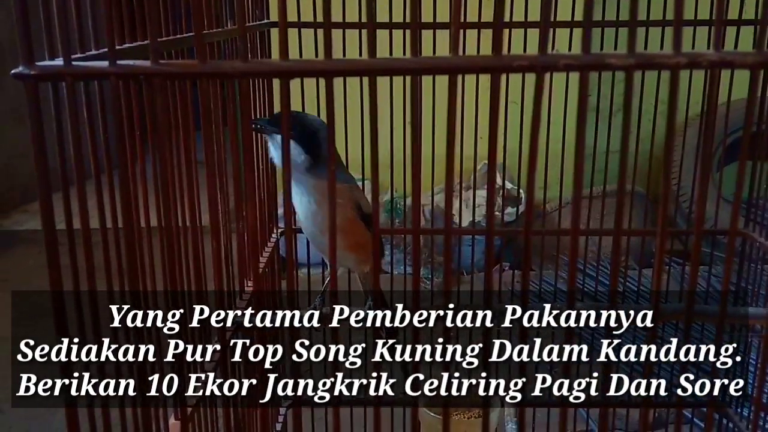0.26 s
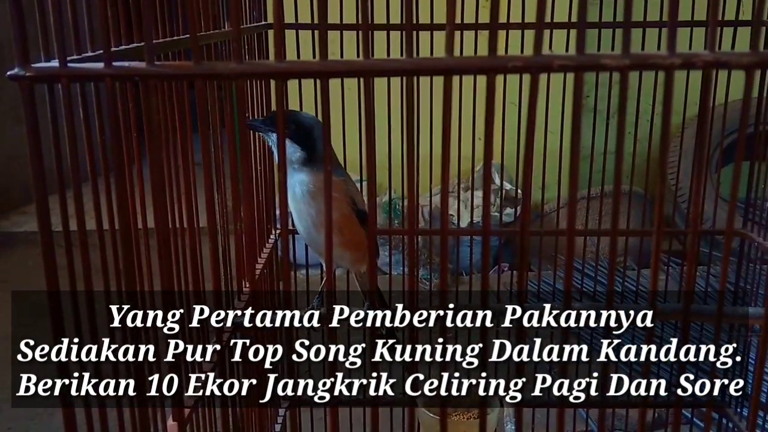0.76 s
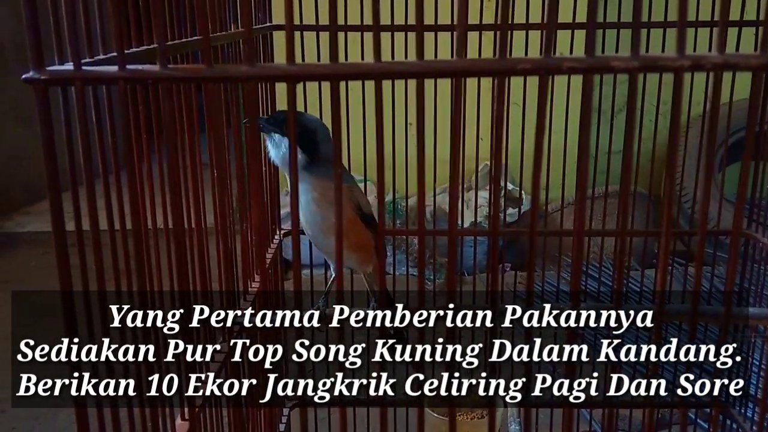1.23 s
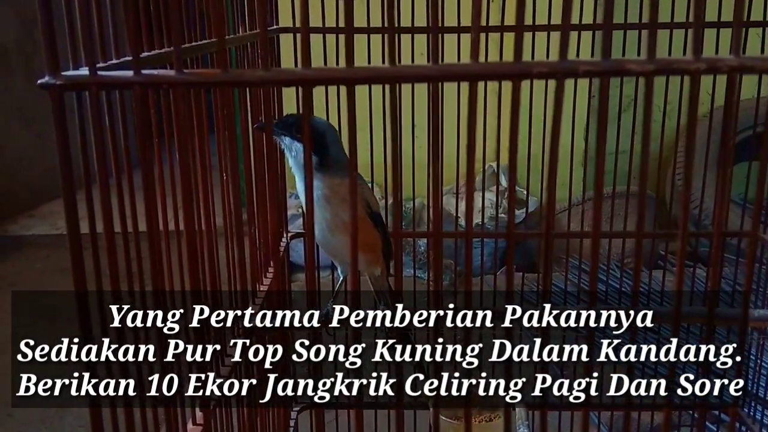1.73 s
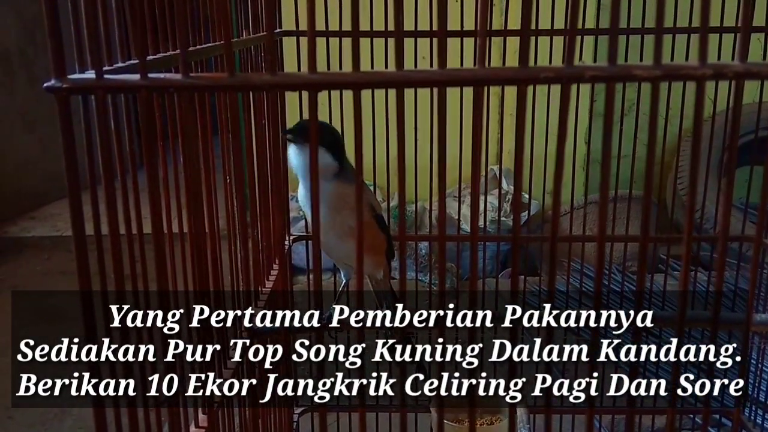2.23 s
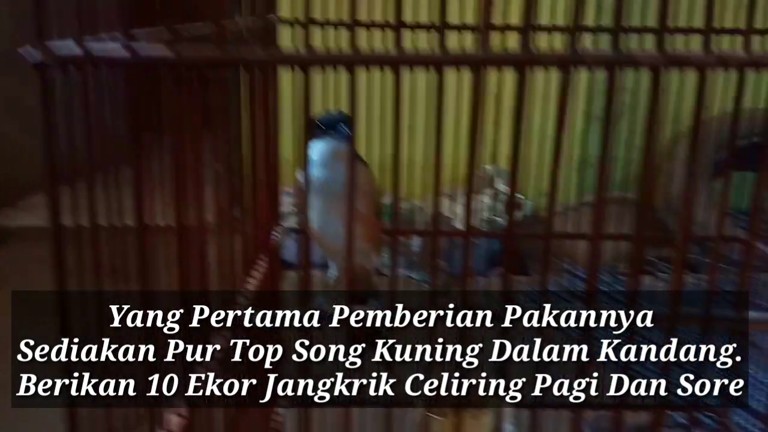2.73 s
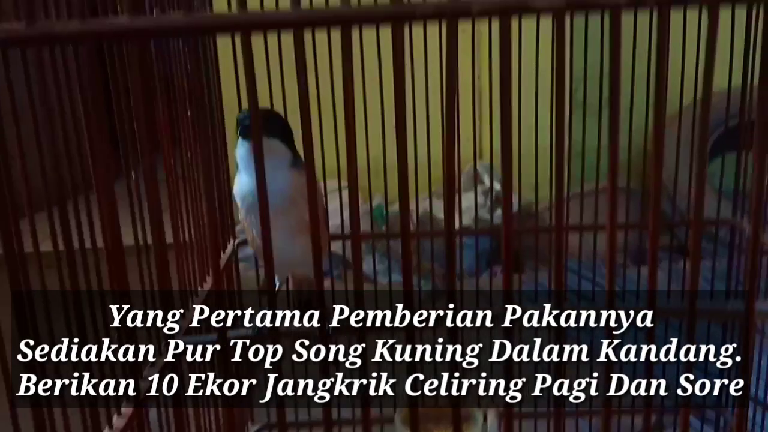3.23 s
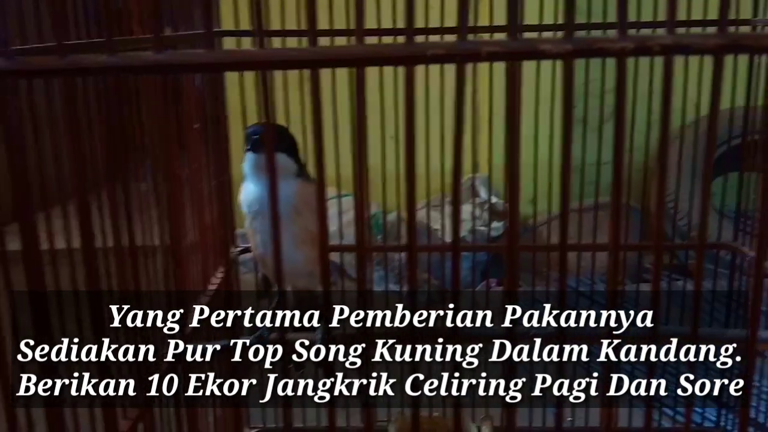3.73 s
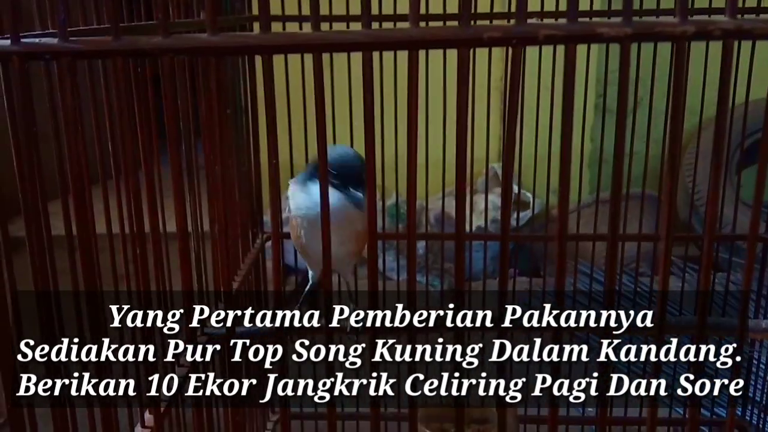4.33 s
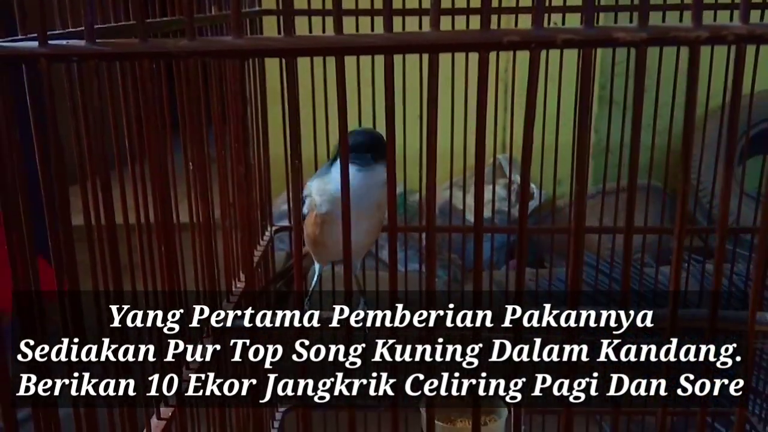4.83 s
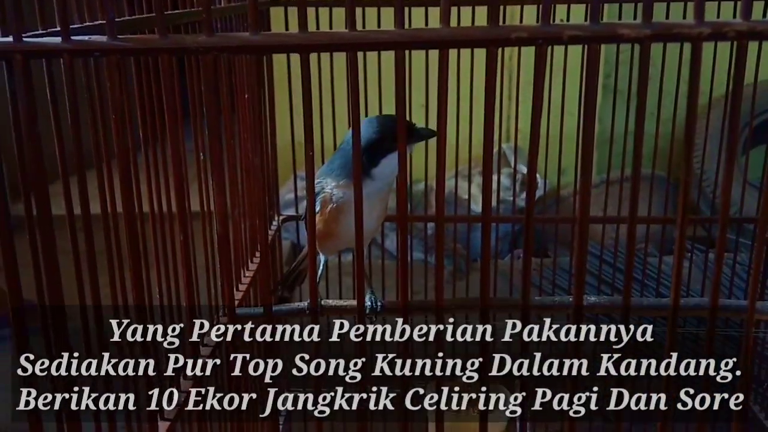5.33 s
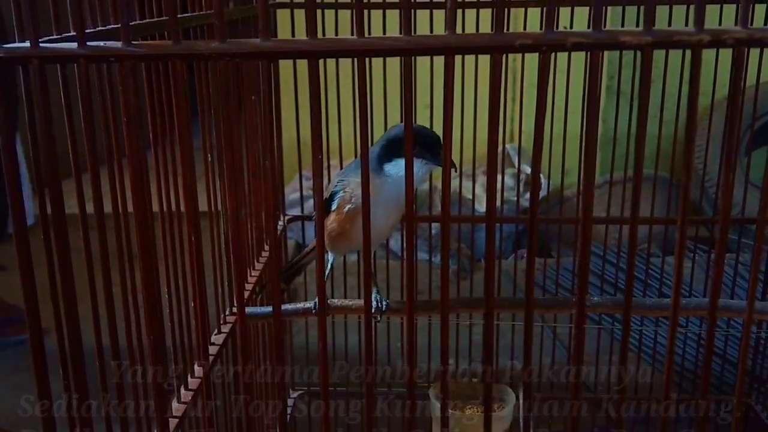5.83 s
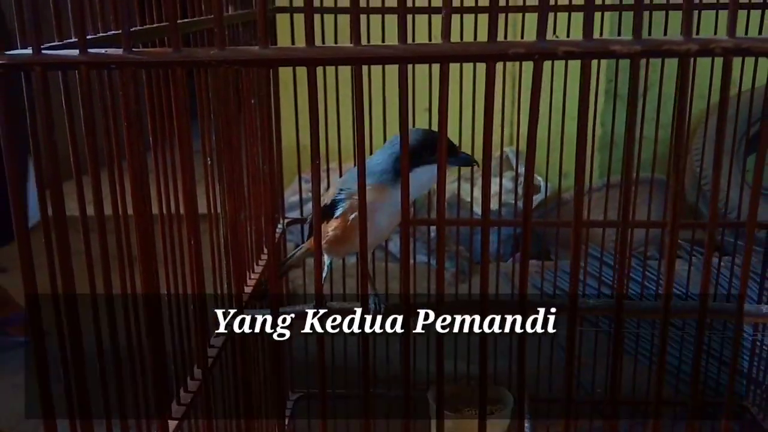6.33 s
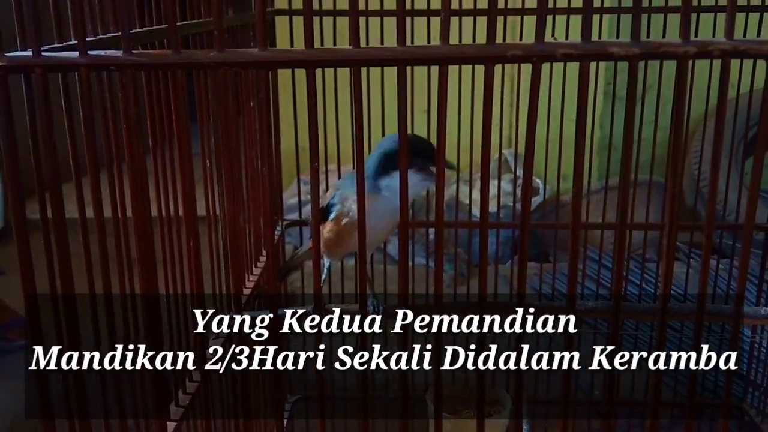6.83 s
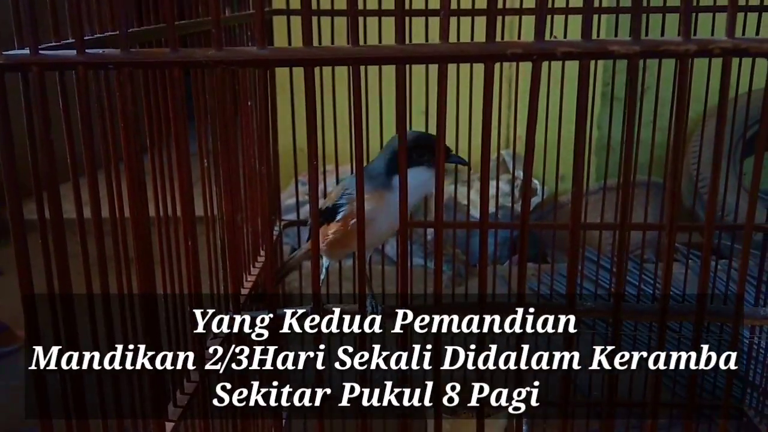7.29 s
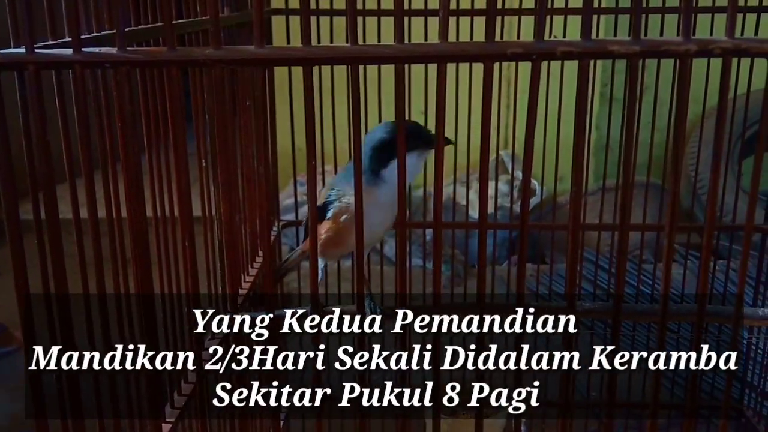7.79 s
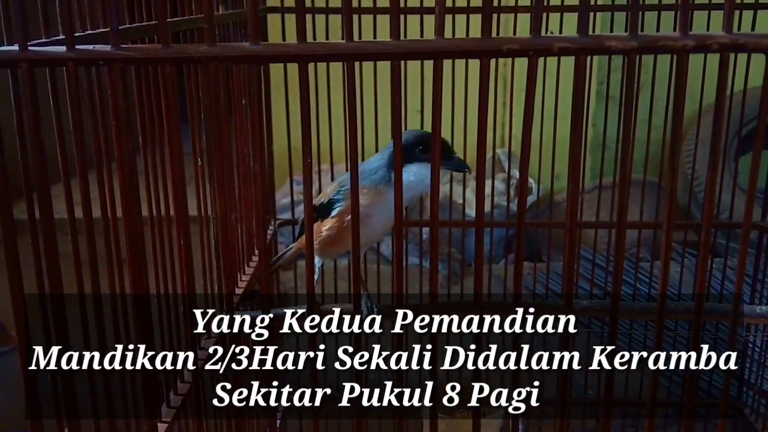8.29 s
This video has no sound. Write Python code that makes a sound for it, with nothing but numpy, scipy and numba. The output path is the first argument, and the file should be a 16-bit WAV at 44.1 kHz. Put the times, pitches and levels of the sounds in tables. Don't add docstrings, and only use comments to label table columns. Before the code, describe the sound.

Short, piercing, scratchy bird calls dominate, each under a quarter second with a hoarse or dropping end and a bright room echo. Distant quick whistles open the scene, two heavy cage landings and lighter knocks come before the third second, then the calls repeat about twice a second. Far buzzing rasps and a small trill answer softly over low traffic rumble and hum, captured by a phone with hard limiting.

```python
import sys
import numpy as np
from scipy import signal
from scipy.fft import rfft, irfft
from scipy.io import wavfile
from scipy.ndimage import uniform_filter1d
from numba import njit

SR = 44100
rng = np.random.default_rng(int(sys.argv[2]) if len(sys.argv) > 2 else 0)


def master(y):
    cut = np.clip(np.atleast_2d(y).T, -1, 1)
    pcm = np.round(cut * 32767)
    wavfile.write(sys.argv[1], SR, pcm.astype(np.int16))


def gain_from_db(level_db):
    decades = np.asarray(level_db, float) / 20
    return 10 ** decades


N = 377055

# f/Hz, level/dB per Hz
STREET_SPECTRUM = [(15, -52), (34, -15), (116, -2.5), (156, -4.5), (183, -0.5), (221, -9), (389, -5.5),
                   (895, -10.5), (1240, -17), (2300, -21.5), (2560, -21.5), (4870, -23), (5580, -23),
                   (15500, -54)]
STREET_DB = -23.5
# f/Hz, width/Hz, level/dB
MOTOR_HUM = [(62.6, 7.2, -39.5), (138, 11.14, -40), (188.7, 7.54, -32.5), (379, 14.18, -40.5)]

# t/s, length/s, start f/Hz, level/dB
SLIDES = [
    (0, 0.013, 3280, -25),
    (.048, 0.049, 3515, -26),
    (.266, .052, 3578, -26),
    (0.512, 0.041, 3410, -26.5),
    (.696, 0.057, 3450, -28.5),
    (0.903, 0.05, 3500, -25.5),
    (7.51, 0.091, 2920, -33),
    (7.995, 0.055, 2920, -49),
]
SLIDE_RATIO, SLIDE_DIRECT_DB = 0.7, -14
# t/s, length/s, start f/Hz, end f/Hz, level/dB
CHIRPS = [
    (.13, 0.056, 6300, 6550, -22.5),
    (.138, .02, 3230, 5160, -26),
    (.158, 0.052, 5030, 3850, -16.5),
    (.481, .089, 6490, 6364, -27),
    (.487, 0.0085, 3280, 5510, -24),
    (.511, .045, 5080, 4155, -16.5),
]
# t/s, length/s, start f/Hz, end f/Hz, level/dB
TRILL = [
    (4.85, 0.034, 5860, 6100, -28),
    (4.988, 0.034, 5920, 5520, -26),
    (5.123, 0.037, 5270, 5630, -29.5),
    (5.141, .043, 5830, 5170, -29.5),
    (5.242, 0.048, 5570, 5250, -27),
    (5.315, 0.058, 5470, 5270, -26.5),
    (5.435, 0.058, 5400, 5420, -39),
]
CHIRP_DIRECT_DB, TRILL_DIRECT_DB = -6.5, 0

# t/s, level/dB, treble level/dB, rattle length/s
THUMPS = [
    (0.078, -32.5, 17, 0.056),
    (2.433, -8.5, 6, 0.044),
    (2.719, -8.5, 2, 0.058),
    (2.975, -19.5, 7.5, 0.037),
    (3.228, -19.5, 5, 0.0061),
    (3.242, -45, 7, 0.023),
    (4.417, -35, 9, 0.0044),
]
# f/Hz, level/dB per Hz
CAGE_SPECTRUM = [(24, -45), (40, -12), (58, -15.5), (197, -5), (280, -11.5), (548, -17), (817, -25.5),
                 (903, -25.5), (1960, -29.5), (3930, -24), (15500, -46.5)]

# t/s, catch in the voice t/s, opening f/Hz, held f/Hz, opening throat f/Hz
FALLING_CALLS = [
    (0.196, 0.296, 1263, 1077, 3550),
    (1.079, 1.179, 1286, 1080, 3870),
    (2.156, 2.256, 1287, 1114, 3770),
    (3, 3.096, 1342, 1078, 3900),
]
# t/s, catch in the voice t/s, opening f/Hz, held f/Hz, opening throat f/Hz
ARCHED_CALLS = [
    (4.055, 4.146, 1710, 1297, 2770),
    (4.52, 4.617, 1759, 1303, 2570),
    (4.884, 4.972, 1546, 1254, 3040),
    (5.478, 5.573, 1466, 1303, 2760),
    (5.951, 6.05, 1708, 1307, 2320),
    (6.379, 6.471, 1578, 1265, 3060),
    (6.782, 6.867, 1406, 1226, 2890),
    (7.203, 7.298, 1490, 1271, 2840),
    (7.591, 7.692, 1528, 1278, 2890),
    (8.177, 8.273, 1657, 1301, 2580),
]
# share of the way, pitch/held pitch, level/dB, throat move to goal/0-1, roughness/0-1
FALL = [(0, 1.27, -9.5, 0.1, .4), (.2, 1.06, -9, 0.2, .35), (.38, 1.025, -8.5, 0, .22),
        (1.001, .98, -1.5, 1, 0.14)]
ARCH = [(0, 0.99, -4, 0.66, .4), (.12, .9, -12, 0.026, 0.46), (.38, .9, -8.5, 0, 0.39),
        (0.561, .94, -8.5, 0.61, .2), (.78, 1.015, -5.5, 0.9, .15), (1, .99, -3.5, .97, .18)]
# t after the catch/s, pitch/held pitch, level/dB, throat f/Hz, roughness/0-1
HOARSE_END = [(.015, .92, -7, 2900, .55), (0.088, .93, -14.5, 2770, 0.53), (.13, .92, -37, 2860, .5)]
DROP = [(.018, 0.91, -6.5, 3680, 0.383), (.04, .8, -10, 2890, 0.56), (0.091, .7, -32.5, 1950, 0.37)]
FALL_GOAL_HZ, ARCH_GOAL_HZ = 3110, 3890
FALL_SNAP_S, ARCH_SNAP_S = 0.024, 0.018
CALL_RISE_S = 0.012
# f/Hz, level/dB
SYRINX = [(800, -14), (1100, -27), (1300, -16), (1600, -6), (2250, -12.5), (2800, -16), (5100, -14),
          (6500, -21), (9000, -29), (12000, -28), (15000, -24)]
THROAT_WIDTH_HZ, THROAT_DB = 1200, 18
TUBE_MODE, TUBE_WIDTH_HZ, TUBE_DB = 3.23, 2040, 11
BEAK_MODE, BEAK_WIDTH_HZ, BEAK_DB = 1.315, 1460, 5.5
CLOSING_DB, CLOSING_S = -0.5, 0.036
KNEE_DB, PUSH = -12, 2.6
ROOM_PUSH = 0.93

# t/s, length/s, level/dB, start centre f/Hz, end centre f/Hz
RASPS = [
    (0.847, 0.21, -18, 4020, 3566),
    (1.435, 0.47, -19.5, 3616, 3088),
    (3.66, 0.55, -19.5, 3268, 3220),
    (5.671, .25, -26.5, 3550, 3095),
    (6.541, .21, -28.5, 3247, 2753),
]
BUZZ_HZ, BUZZ_BEND, RASP_SWEEP = 126.1, 3, 0.53
RASP_SECOND_DB, RASP_THIRD_DB = -9.5, -19.5
RASP_BEAK_HZ, RASP_BEAK_WIDTH_HZ = 6250, 1230
RASP_RISE_S, RASP_TIRE_S = 0.034, 0.14

# f/Hz, t60/s
ROOM_DECAY = [(150, 0.9), (600, 0.78), (2500, 0.67), (5000, 0.54), (10000, 0.43), (15000, 0.07)]
NEAR_WET_DB, FAR_WET_DB, THUMP_WET_DB, RASP_DRY_DB = -14.5, -2, 8.5, -5.5
CEILING, ATTACK_S, RELEASE_S = 0.7, 0.0004, 0.017


def set_rms(x, db):
    return x * gain_from_db(db) / np.sqrt(np.mean(x ** 2))


def lookup(table, hz):
    table_hz, values = np.array(table).T
    return np.interp(np.log(np.maximum(hz, 1)), np.log(table_hz), values)


def colour(x, table):
    gain = gain_from_db(lookup(table, np.fft.rfftfreq(len(x), 1 / SR)))
    return irfft(rfft(x) * gain, len(x))


def wobble(size, rate_hz):
    lowpass = signal.butter(2, rate_hz, fs=SR, output="sos")
    wander = signal.sosfilt(lowpass, rng.standard_normal(size + 2000))
    return set_rms(wander[2000:], 0)


def resonance(hz, centre_hz, width_hz):
    return 1 / (1 + (2 * (hz - centre_hz) / width_hz) ** 2)


def add(out, s, x):
    i = int(max(s, 0) * SR)
    out[i:i + len(x)] += x[:len(out) - i]


def unroll(start, stop):
    t = np.arange(0, stop - start, 1 / SR)
    ramp = np.minimum(t / 0.008, (t[-1] - t) / 0.015)
    return t, np.clip(ramp, 0, 1) ** 2


def street():
    rumble = colour(rng.standard_normal(N), STREET_SPECTRUM)
    out = set_rms(rumble * gain_from_db(0.18 * wobble(N, 3)), STREET_DB - 1.5)
    for hz, width_hz, db in MOTOR_HUM:
        cycles = np.cumsum(hz + 0.2784 * width_hz * wobble(N, 3.83)) / SR
        swell = gain_from_db(3.4 * wobble(N, width_hz))
        out = out + set_rms(np.sin(2 * np.pi * cycles) * swell, db)
    return out


def whistles():
    sung, direct = np.zeros(N), np.zeros(N)
    slides = [(s, length, hz, hz * SLIDE_RATIO, db) for s, length, hz, db in SLIDES]
    groups = (slides, SLIDE_DIRECT_DB), (CHIRPS, CHIRP_DIRECT_DB), (TRILL, TRILL_DIRECT_DB)
    for notes, direct_db in groups:
        for s, length, start_hz, end_hz, db in notes:
            u = np.linspace(0, 1, int(length * SR))
            flutter = 1 + 0.012 * wobble(4410, 200)[:len(u)]
            throb = gain_from_db(3 * wobble(4410, 70)[:len(u)])
            hz = (start_hz + (end_hz - start_hz) * u) * flutter
            phase = 2 * np.pi * np.cumsum(hz) / SR
            tone = np.sin(phase) + gain_from_db(-31) * np.sin(2 * phase)
            note = gain_from_db(db + 14.5) * throb * np.sin(np.pi * u) ** 0.29 * tone
            add(sung, s, note)
            add(direct, s, note * gain_from_db(direct_db))
    return sung, direct


def thumps():
    out, t = np.zeros(N), np.arange(SR // 2) / SR
    lowpass = signal.butter(2, 900, fs=SR, output="sos")
    for s, db, treble_db, length in THUMPS:
        shake = colour(rng.standard_normal(len(t)) * gain_from_db(4 * wobble(len(t), 80)), CAGE_SPECTRUM)
        low = signal.sosfilt(lowpass, shake)
        boom = set_rms(low, 0) * np.exp(-t / length)
        rattle = set_rms(shake - low, treble_db) * np.exp(-t / (0.59 * length))
        rise = 1 - np.exp(-t / (0.25 * length))
        add(out, s, rise * gain_from_db(db) * (boom + rattle))
    return out


def phrase(call, head, end, goal_hz, snap_s):
    start, catch, opening_hz, held_hz, throat_hz = call
    rows = [(u * (catch - start), p, db, throat_hz + move * (goal_hz - throat_hz), r)
            for u, p, db, move, r in head]
    rows += [(catch - start + s, *rest) for s, *rest in end]
    s, *columns = np.transpose(rows)
    t, edge = unroll(0, s[-1])
    edge = edge * np.tanh(t / CALL_RISE_S)
    share, db, throat, rough = (np.interp(t, s, c) for c in columns)
    settled_hz = share * held_hz
    hz = settled_hz + (opening_hz - settled_hz) * np.exp(-(t / snap_s) ** 2)
    return start, t - (catch - start), edge, hz, db, throat, rough


def shrike():
    near, aside = np.zeros(N), np.zeros(N)
    k = np.arange(1, 17)[:, None]
    calls = [phrase(c, FALL, HOARSE_END, FALL_GOAL_HZ, FALL_SNAP_S) for c in FALLING_CALLS]
    calls += [phrase(c, ARCH, DROP, ARCH_GOAL_HZ, ARCH_SNAP_S) for c in ARCHED_CALLS]
    for start, since_catch, edge, hz, db, throat_hz, rough in calls:
        hz = uniform_filter1d(hz, size=220)
        rough = np.clip(rough, 0.12, np.where(since_catch > 0, 0.7, 0.42))
        hz = hz * (1 + 0.14 * rough * wobble(len(hz), 220))
        jitter = uniform_filter1d(rng.standard_normal((16, 12000)), size=40)[:, :len(hz)]
        phase = k * 2 * np.pi * np.cumsum(hz) / SR + 2.56 * rough * k * jitter
        partial_hz = k * hz
        partial_db = 0.048 * k * np.minimum(db + 4.0, 0)
        partial_db = partial_db + CLOSING_DB * k * np.clip(since_catch / CLOSING_S, 0, 1)
        partial_db += lookup(SYRINX, partial_hz)
        partial_db += THROAT_DB * resonance(partial_hz, throat_hz, THROAT_WIDTH_HZ)
        partial_db += TUBE_DB * resonance(partial_hz, TUBE_MODE * throat_hz, TUBE_WIDTH_HZ)
        partial_db += BEAK_DB * resonance(partial_hz, BEAK_MODE * throat_hz, BEAK_WIDTH_HZ)
        gain = gain_from_db(partial_db) * (partial_hz < 17000)
        voice = np.sum(gain * np.sin(phase), axis=0) / np.sqrt(np.sum(gain ** 2, axis=0) / 2)
        scratch = gain_from_db(11 * np.minimum(rough, 0.3) * wobble(len(hz), 300))
        catch_db = -14 * np.exp(-(since_catch / 0.0055) ** 2)
        for path, push in (near, PUSH), (aside, ROOM_PUSH):
            effort_db = db + catch_db + push * np.maximum(db - KNEE_DB, 0)
            add(path, start, voice * scratch * edge * gain_from_db(effort_db))
    return near, aside


def rasps():
    out = np.zeros(N)
    for s, length, db, start_hz, end_hz in RASPS:
        t, edge = unroll(s, s + length)
        centre_hz = start_hz + (end_hz - start_hz) * t / length
        cycle = np.cumsum(BUZZ_HZ * (2 + 0.35 * wobble(len(t), 60))) / SR % 1
        sweep = RASP_SWEEP * ((1 - cycle) ** BUZZ_BEND - 0.2)
        hz = centre_hz * (1 + sweep + 0.0305 * wobble(len(t), 470))
        phase = 2 * np.pi * np.cumsum(hz) / SR
        puff = np.sin(np.pi * cycle) ** 0.17 * gain_from_db(3.2 * wobble(len(t), 90))
        second = gain_from_db(RASP_SECOND_DB) * resonance(2 * hz, RASP_BEAK_HZ, RASP_BEAK_WIDTH_HZ)
        tone = np.sin(phase) + second * np.sin(2 * phase) + gain_from_db(RASP_THIRD_DB) * np.sin(3 * phase)
        swell = np.tanh(t / RASP_RISE_S) * gain_from_db(db - (t / RASP_TIRE_S) ** 2)
        add(out, s, 3.21 * puff * tone * edge * swell)
    return out


def room(x):
    t, tail = np.arange(SR) / SR, 0
    for hz in 62.5 * 2 ** np.arange(0, 8, 0.5):
        bandpass = signal.butter(2, [hz, hz * 2 ** 0.5], "band", fs=SR, output="sos")
        band = signal.sosfilt(bandpass, rng.standard_normal(SR))
        tail = tail + band * gain_from_db(-60 * t / lookup(ROOM_DECAY, hz))
    tail = tail * np.clip((t - 0.004) / 0.0058, 0, 1)
    tail = tail / np.sqrt(np.sum(tail ** 2)) * 0.65
    return signal.fftconvolve(x, tail, axes=-1)[:N]


def scene():
    background = street()
    sung, direct = whistles()
    cage = thumps()
    near, aside = shrike()
    buzz = rasps()
    far = gain_from_db(FAR_WET_DB) * (buzz + sung)
    wet = room(gain_from_db(NEAR_WET_DB) * aside + far + gain_from_db(THUMP_WET_DB) * cage)
    return (near + gain_from_db(RASP_DRY_DB) * buzz + direct + cage + wet + background)[None]


@njit
def limiter(x, ceiling, attack, release):
    y, follower = np.empty(len(x)), 0.
    for i in range(len(x)):
        peak = abs(x[i])
        follower += (peak - follower) * (attack if peak > follower else release)
        y[i] = x[i] * ceiling / max(follower, ceiling)
    return y


def top_cut(x):
    return signal.sosfilt(signal.butter(12, 15750, fs=SR, output="sos"), x)


def record(dry):
    held = limiter(dry[0], CEILING, 1 / (ATTACK_S * SR), 1 / (RELEASE_S * SR))
    flat = held / (1 + (held / 0.8) ** 6) ** (1 / 6)
    return top_cut(flat[None])


dry = scene()
out = record(dry)
master(out)
```